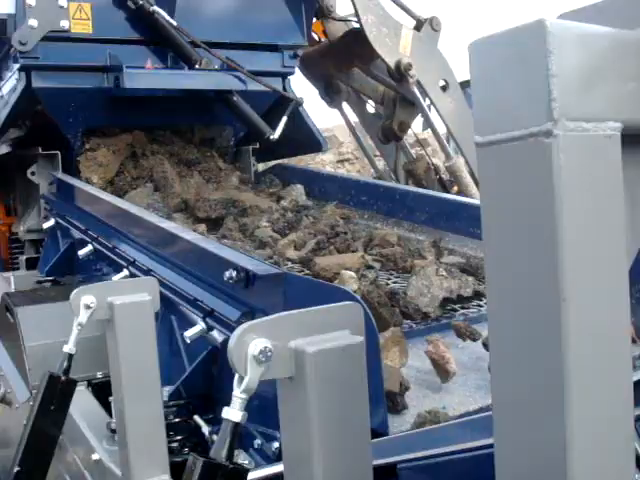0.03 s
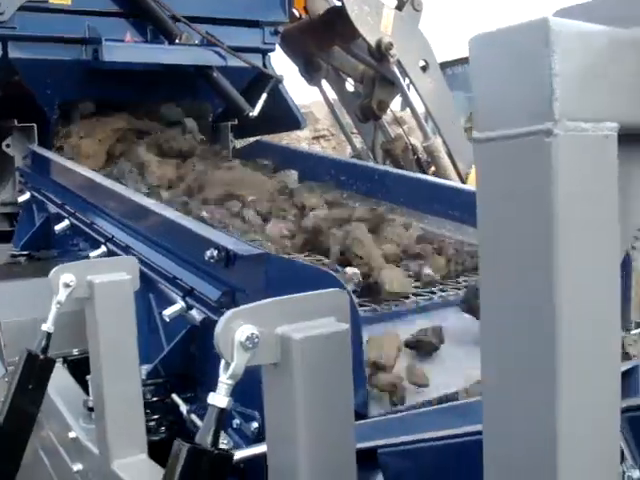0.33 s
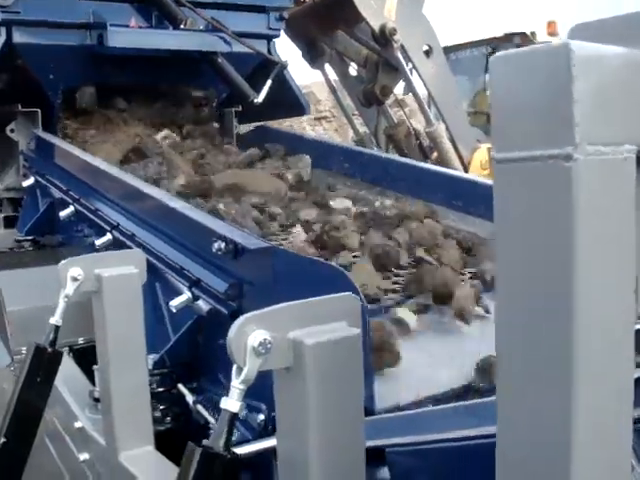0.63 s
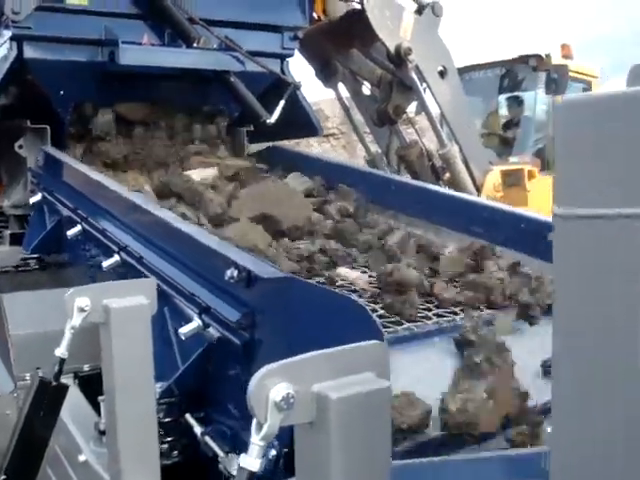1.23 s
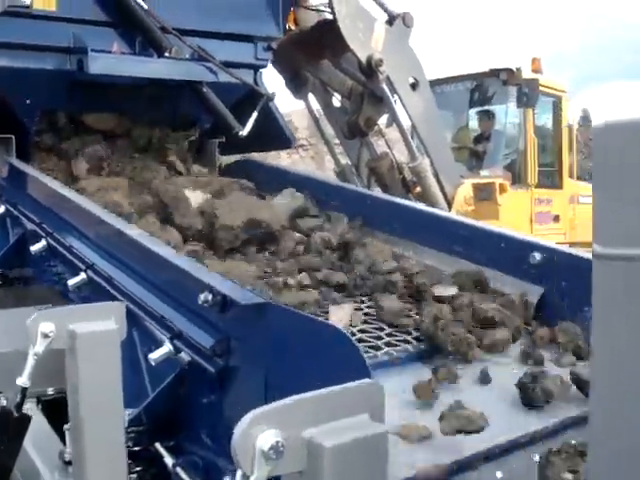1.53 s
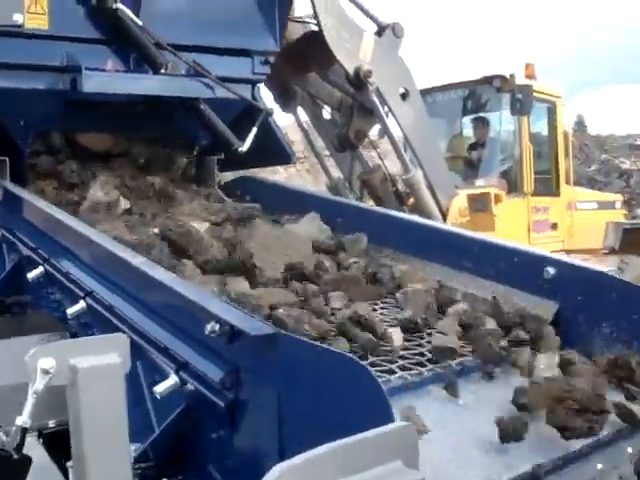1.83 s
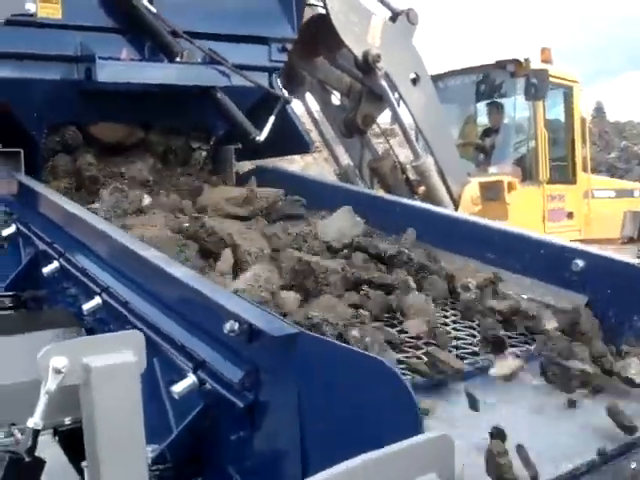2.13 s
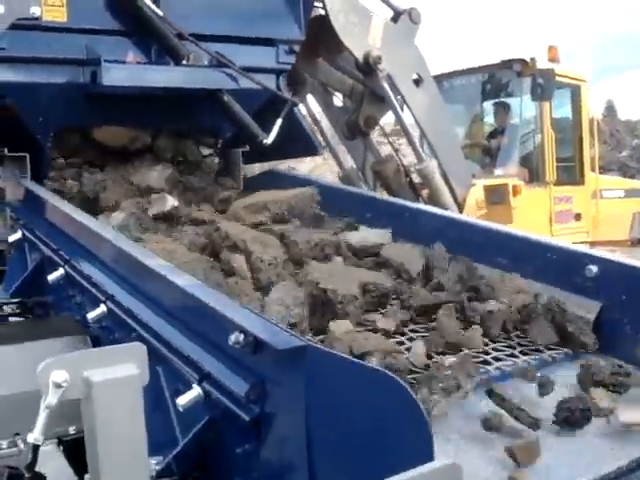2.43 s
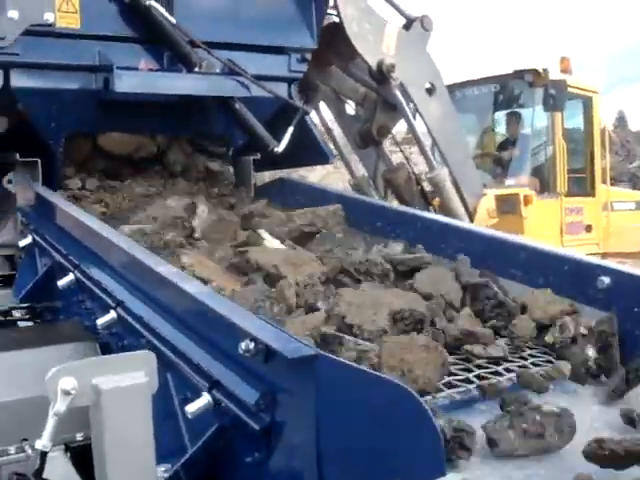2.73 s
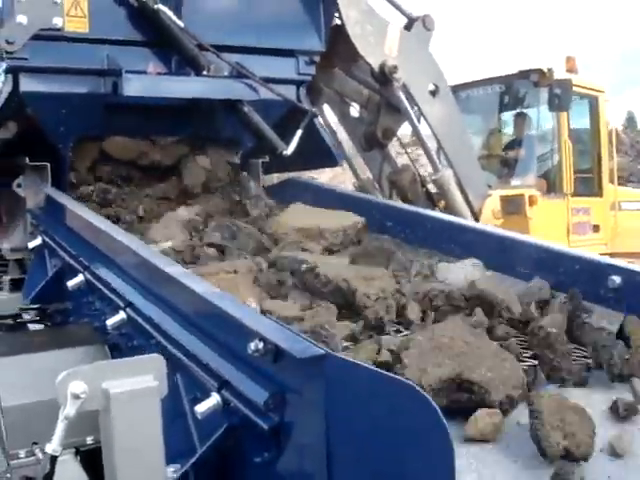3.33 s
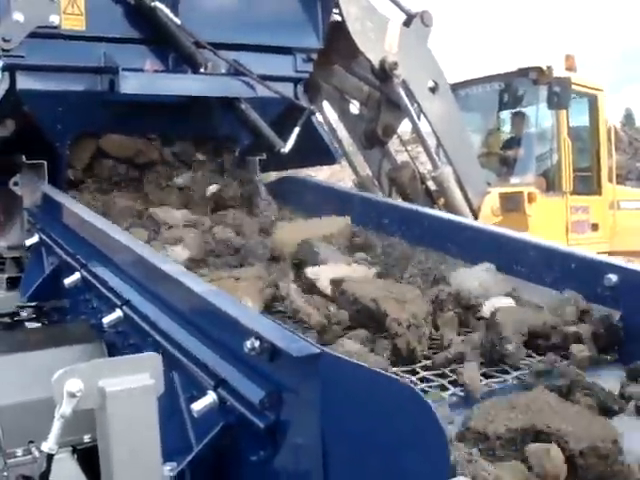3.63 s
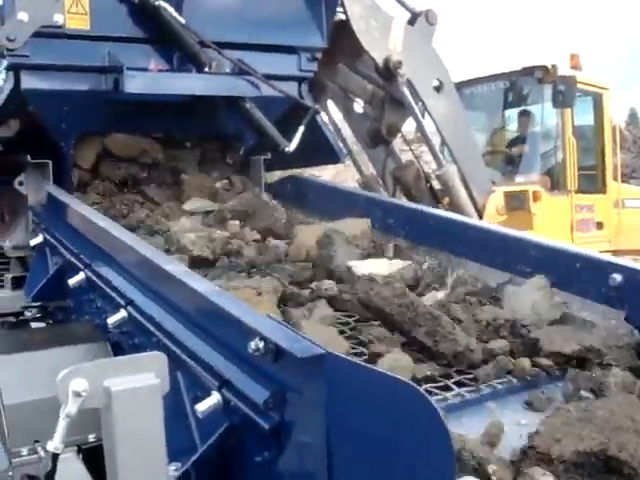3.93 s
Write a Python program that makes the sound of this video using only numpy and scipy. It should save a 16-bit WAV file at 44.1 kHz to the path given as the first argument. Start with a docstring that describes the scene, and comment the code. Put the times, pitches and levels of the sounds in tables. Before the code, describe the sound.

Close by outdoors, a vibrating screen shakes crushed stone on steel mesh in a fast, pulsing rattle over a diesel drone. Single stones crack throughout, big pieces clang midway, and heavy lumps thud at the start and end.

```python
"""A vibrating screen sorts crushed stone and asphalt outdoors; close, mono, 4 s.
It cuts in already running: a diesel engine drones, heavy lumps thud, and the steel deck throws its load
about 13 times a second, each stroke a burst of stone contacts that ring the mesh and side plates.
Single stones crack and chips snap throughout. Big pieces clang on the side plate at 0.3 s and from
1.7 to 2.5 s. More lumps land from 3.4 s."""
import sys
import numpy as np
from scipy import signal
from scipy.fft import rfft, irfft, next_fast_len
from scipy.io import wavfile
from scipy.ndimage import uniform_filter1d, minimum_filter1d, map_coordinates

SR = 44100
rng = np.random.default_rng(int(sys.argv[2]) if len(sys.argv) > 2 else 0)


def generate_wav(signal):
    """Clip the signal to [-1, 1] and save it as 16-bit WAV at the path in sys.argv[1]."""
    frames = np.transpose(np.atleast_2d(signal))
    scaled = np.clip(frames, -1, 1) * 32767
    pcm = np.round(scaled).astype(np.int16)
    wavfile.write(sys.argv[1], SR, pcm)


N = 176400

STROKE_HZ, FIRST_STROKE_S = 12.915, .036
RISE_S, HOLD_S, FALL_DB_PER_S, FLOOR_DB = .016, .021, 210.5, -14.5
STROKE_SCATTER_S, STROKE_SCATTER_DB, SLAM_WIDTH_S = .001, .3, .012
RUMBLE_DB, RUMBLE_EXPONENT = -24, .11
LUMP_GAIN_DB, LUMP_ATTACK_S, LUMP_T60_S = 6, .0092, .23
STEEL_DB, GRIT_DB, STONE_DB = -26, -20.5, -18
MODE_HITS_PER_S, GRIT_PER_S, STONES_PER_S = 400, 7000, 1100  # at unit force
GRIT_EXPONENT, GRIT_DRIFT_DB = 1.5, 1.1
START_S, FADE_S, CEILING, LIMITER_S = .079, .0035, .7, .006
LOW_CUT_HZ, TOP_HZ = 83, 10150

# frame rumble: f/Hz, level/dB
RUMBLE_SPECTRUM = [(25, -52), (80, -50.5), (120, -13), (200, -9), (340, 2.5), (550, 5.5), (900, 3),
                   (2000, 0.5), (6000, -56.5)]
# engine and drive tones: f/Hz, level/dB
ENGINE_TONES = [(118, -55.5), (155, -55.5), (197, -49.5), (403.7, -38.5)]
# lumps landing on the deck: t/s, relative level/dB
LUMP_HITS = [(0.083, -26), (.177, -29), (0.406, -27.5), (.445, -27), (0.746, -28.5), (3.433, -25),
             (3.515, -29), (3.691, -21.5), (3.714, -22.5), (3.764, -22), (3.94, -27.5)]
# lump thud: f/Hz, level/dB
LUMP_SPECTRUM = [(50, -37), (90, -24), (130, -4), (210, 0), (380, 1), (700, 4), (1300, -24), (4000, -60)]
# big pieces hitting the side plate: t/s, level/dB
PLATE_HITS = [(0.286, -25), (1.745, -20.5), (1.815, -25), (1.985, -20.5), (2.08, -23), (2.461, -25)]
# side plate modes: f/Hz, level/dB, t60/s
PLATE_MODES = [(941, -2.5, .22), (936, -7, .22), (1820, -7, .18), (1820, -6, .18), (2365, -5, 0.34),
               (2640, -6.5, .22), (2772, 1, .3)]
# hard single stones: t/s, relative level/dB
STONE_HITS = [(.184, 5), (.442, -2), (.505, 10), (.741, -4), (1.055, -5), (1.438, -1), (1.534, -5),
              (1.74, 5), (1.986, -2), (2.294, 0), (2.596, -9), (2.705, -3), (3.064, 0), (3.837, -4)]
# chips on bare steel: t/s, relative level/dB
SNAP_HITS = [(0.4424, -12), (1.5344, -11), (1.6844, -16), (1.7644, -11), (1.9869, -10), (2.1454, -10),
             (2.7054, -16), (2.9244, -14), (3.0814, -13), (3.3974, -16)]
# chip snap: f/Hz, level/dB
SNAP_SPECTRUM = [(500, -31), (2500, -6), (5000, 0), (10000, -2.5)]
# mesh and side plate modes: f/Hz, relative level/dB, t60/s
STEEL_MODES = [(334.8, -7.5, 0.38), (460, -5, 0.34), (899, -2, .15), (963, -3.5, 0.16), (1136, -3.5, .1),
               (1231, 0, .1), (1526, -4, .12), (1870, 0.5, 0.15), (2090, -9, 0.11), (2406, -10, 0.16),
               (2767, 1.5, 0.096), (2988, 4, 0.041), (3285, -3.5, 0.13), (3985, -3.5, 0.22),
               (4420, -2.5, 0.17), (4950, -4.5, 0.16)]
# fine chips: f/Hz, level/dB
GRIT_SPECTRUM = [(200, -36.5), (700, -10.5), (1500, 6), (2900, 0), (3500, 1), (5000, -4), (7000, -9.5),
                 (10000, -18.5)]
# stone contacts: f/Hz, level/dB
STONE_SPECTRUM = [(60, -47), (120, -31.5), (200, -15.5), (330, -5.5), (500, -4), (780, -1.5), (900, 1.5),
                  (1400, -4.5), (2800, 0.5), (3600, -9.5), (5200, -9), (7000, -19), (10000, -30.5)]
# batches of stone landing together: t/s, relative strength
SLAMS = [(0.093, 2), (.292, .8), (1.065, .7), (1.138, .9), (1.45, .9), (1.767, 1), (2.152, 1), (2.226, .7),
         (2.38, .7), (2.768, 1.1), (2.927, 1), (3.08, 0.31), (3.39, .7), (3.701, 0.86)]


def amp(db):
    """Decibels to gain."""
    return 10 ** (np.asarray(db) / 20)


def unit(x):
    """Scale to rms 1."""
    return x / np.sqrt(np.mean(x ** 2) + 1e-20)


def wobble(knots_per_s):
    """Smooth random curve."""
    knots = rng.standard_normal(int(N * knots_per_s / SR) + 4)
    return map_coordinates(knots, [np.arange(N) * knots_per_s / SR])


def colour(x, spectrum, size=4096):
    """Minimum-phase filter of unit energy through f/Hz, level/dB points."""
    hz, db = np.transpose(spectrum)
    gain = amp(np.interp(np.log(np.fft.rfftfreq(size, 1 / SR) + 1), np.log(hz), db))
    cepstrum = irfft(np.log(gain))
    cepstrum[1:size // 2] *= 2
    cepstrum[size // 2 + 1:] = 0
    response = irfft(np.exp(rfft(cepstrum)))
    return signal.fftconvolve(x, response / np.linalg.norm(response))[:N]


def clack(t60_s, ring_db):
    """One contact: a crack and a short ring of random colour."""
    t = np.arange(SR // 10) / SR
    ring = rng.standard_normal(len(t)) * amp(-60 * t / t60_s)
    ring *= amp(ring_db) / np.linalg.norm(ring)
    ring[0] += 1  # crack
    return ring / np.linalg.norm(ring)


def contacts(force, per_s, spread_db):
    """Random impacts, denser and harder with force."""
    happens = rng.random(N) < force * per_s / SR
    sizes = amp(spread_db * np.clip(rng.standard_normal(N), -2, 2))
    return happens * sizes * rng.choice([-1, 1], N) * np.sqrt(force)


def machine(force):
    """Frame rumble, weakly following the strokes, plus unsteady engine tones."""
    t, tones = np.arange(N) / SR, np.zeros(N)
    rumble = unit(colour(rng.standard_normal(N), RUMBLE_SPECTRUM))
    rumble *= force ** RUMBLE_EXPONENT * amp(RUMBLE_DB + 1.4 * wobble(5.97))
    for hz, db in ENGINE_TONES:
        peak = np.sqrt(2) * amp(db + 2 * wobble(7))
        tones += peak * np.sin(2 * np.pi * hz * t + 1.08 * wobble(14))
    return rumble + tones


def lumps():
    """Heavy pieces land with a dull, quickly damped boom."""
    t, power = np.arange(N) / SR, np.zeros(N)
    for start_s, db in LUMP_HITS:
        age_s = np.maximum(t - start_s, 0)
        attack = 1 - np.exp(-age_s / LUMP_ATTACK_S)
        power += (attack * amp(db - 60 * age_s / LUMP_T60_S)) ** 2
    boom = unit(colour(rng.standard_normal(N), LUMP_SPECTRUM))
    return amp(LUMP_GAIN_DB) * np.sqrt(power) * boom


def clangs():
    """Big pieces ring the side plate."""
    out, t = np.zeros(N + SR), np.arange(SR // 2) / SR
    for start_s, hit_db in PLATE_HITS:
        for hz, mode_db, t60_s in PLATE_MODES:
            decay = amp(hit_db + mode_db + rng.normal(0, 2.3) - 60 * t / t60_s)
            out[round(start_s * SR):][:len(t)] += decay * np.sin(2 * np.pi * (hz * t + rng.random()))
    return out[:N]


def strikes(hits, spectrum, t60_s):
    """Single hard contacts above the rattle."""
    out = np.zeros(N + SR)
    for start_s, db in hits:
        hit = clack(t60_s, ring_db=9)
        out[round(start_s * SR):][:len(hit)] += amp(db) * hit
    return colour(out[:N], spectrum)


def steel(force):
    """Landing stones ring each deck mode."""
    t, rings = np.arange(SR // 3) / SR, np.zeros(N)
    for hz, db, t60_s in STEEL_MODES:
        hits = contacts(force, MODE_HITS_PER_S, spread_db=5.5)
        mode = np.sin(2 * np.pi * hz * t) * amp(-60 * t / t60_s)
        rings += amp(db) * unit(signal.fftconvolve(hits, mode)[:N])
    return amp(STEEL_DB) * unit(rings)


def grit(force):
    """Fine chips crunch on the mesh at each stroke's peak."""
    drift = amp(GRIT_DRIFT_DB * wobble(9.2))
    hits = contacts(force ** GRIT_EXPONENT, GRIT_PER_S, spread_db=7)
    return amp(GRIT_DB) * unit(colour(drift * hits, GRIT_SPECTRUM))


def stones(force, count=24):
    """Many stones, each clacking with its own colour."""
    pile = np.zeros(N)
    for _ in range(count):
        hits = contacts(force, STONES_PER_S / count, spread_db=4)
        pile += signal.fftconvolve(hits, clack(t60_s=.029, ring_db=4.5))[:N]
    return amp(STONE_DB) * unit(colour(pile, STONE_SPECTRUM))


def strokes():
    """Force of the load on the deck: rise, hold and fall per shaft turn, plus slams."""
    t, power = np.arange(N) / SR, np.zeros(N)
    count = int(N / SR * STROKE_HZ) + 1
    for k, (late, hard) in enumerate(rng.standard_normal((count, 2))):
        age_s = t - FIRST_STROKE_S - k / STROKE_HZ - STROKE_SCATTER_S * late
        active = (age_s > 0) & (age_s < 2 / STROKE_HZ)
        rise = np.minimum(age_s[active] / RISE_S, 1)
        fall_db = FALL_DB_PER_S * np.maximum(age_s[active] - RISE_S - HOLD_S, 0)
        power[active] += rise * amp(STROKE_SCATTER_DB * hard - fall_db) ** 2
    power += amp(FLOOR_DB) ** 2
    power /= power.mean()
    for centre_s, strength in SLAMS:
        power += 2 * strength ** 2 * np.exp(-((t - centre_s) / SLAM_WIDTH_S) ** 2)
    return np.sqrt(power)


def scene():
    """One force drives stones, grit, steel and rumble; single hits are timed separately."""
    force = strokes()
    cracks = strikes(STONE_HITS, STONE_SPECTRUM, t60_s=.02)
    snaps = strikes(SNAP_HITS, SNAP_SPECTRUM, t60_s=.005)
    rattle = stones(force) + grit(force) + steel(force)
    mix = rattle + cracks + snaps + clangs() + lumps() + machine(force)
    return np.array([mix, mix])


def record(dry):
    """Cut-in, peak limiter, low cut, steep band limit."""
    x = dry * np.clip((np.arange(N) / SR - START_S) / FADE_S, 0, 1)
    span = int(LIMITER_S * SR)
    needed_gain = CEILING / np.maximum(np.abs(x), CEILING)
    held_gain = minimum_filter1d(needed_gain, 2 * span)
    x *= uniform_filter1d(uniform_filter1d(held_gain, span), span)
    x = signal.sosfilt(signal.butter(1, LOW_CUT_HZ, "highpass", fs=SR, output="sos"), x)
    size = next_fast_len(N + SR // 2)
    passband = np.clip((TOP_HZ - np.fft.rfftfreq(size, 1 / SR)) / 100 + .5, 0, 1)  # 100 Hz edge
    return irfft(rfft(x, size) * passband, size)[:, :N]


dry = scene()
out = record(dry)
generate_wav(out)
```